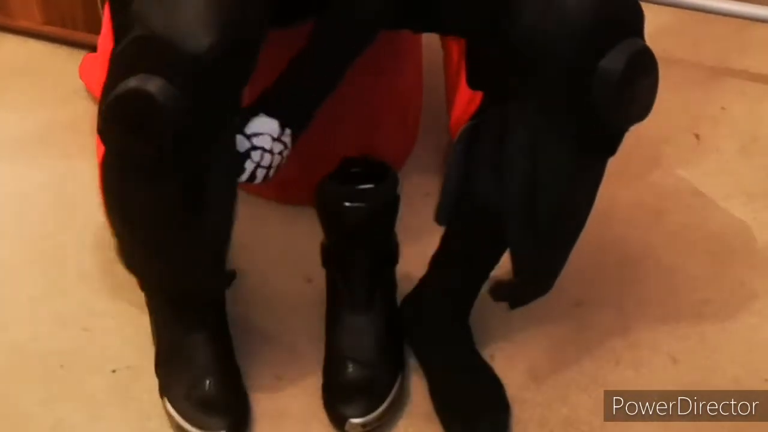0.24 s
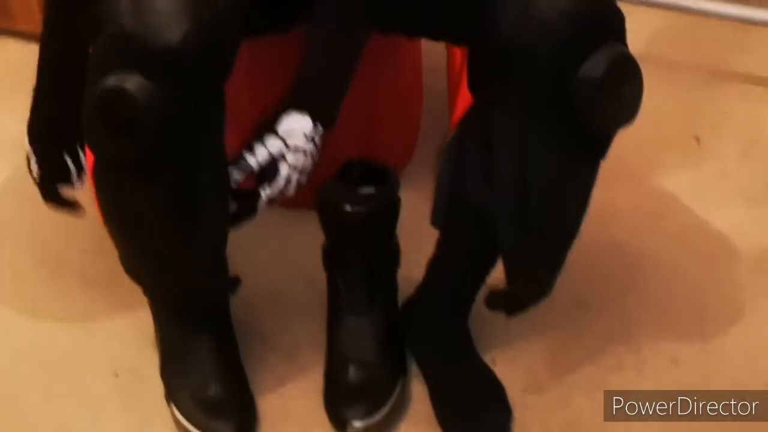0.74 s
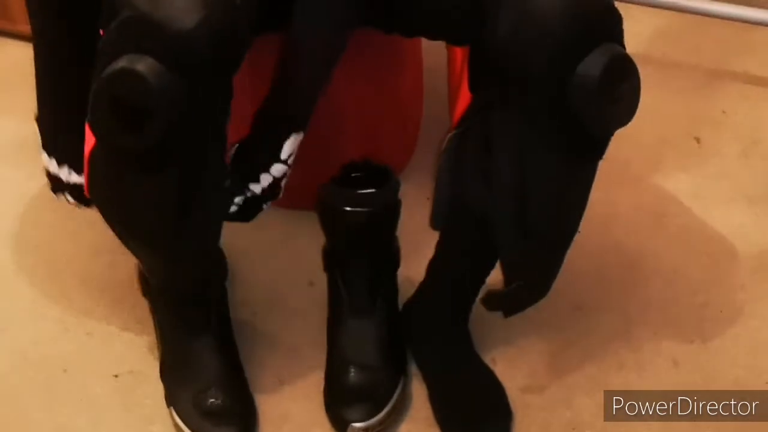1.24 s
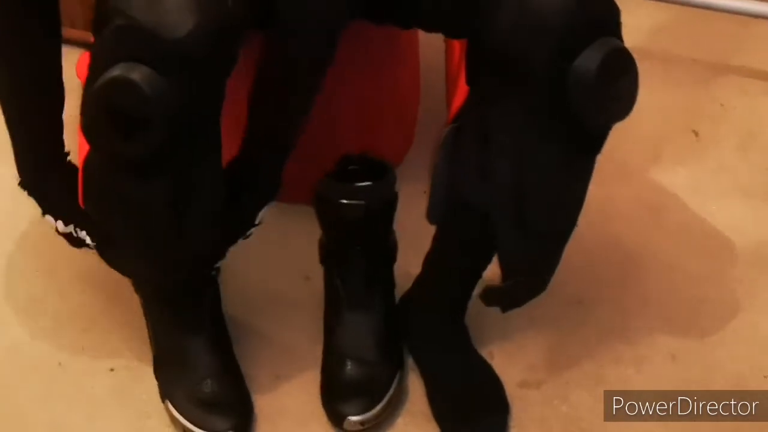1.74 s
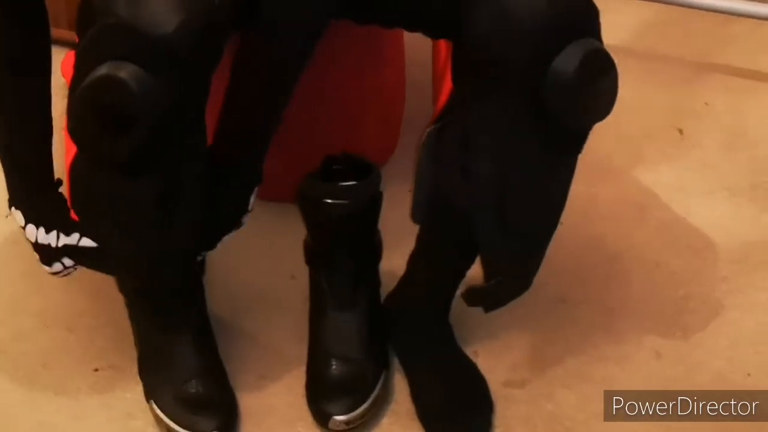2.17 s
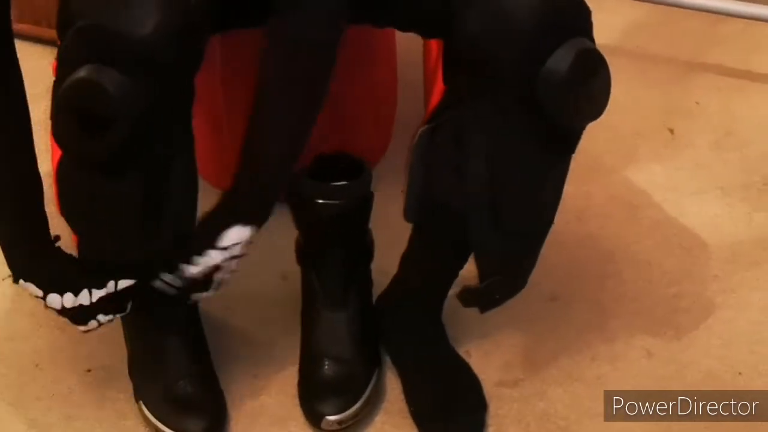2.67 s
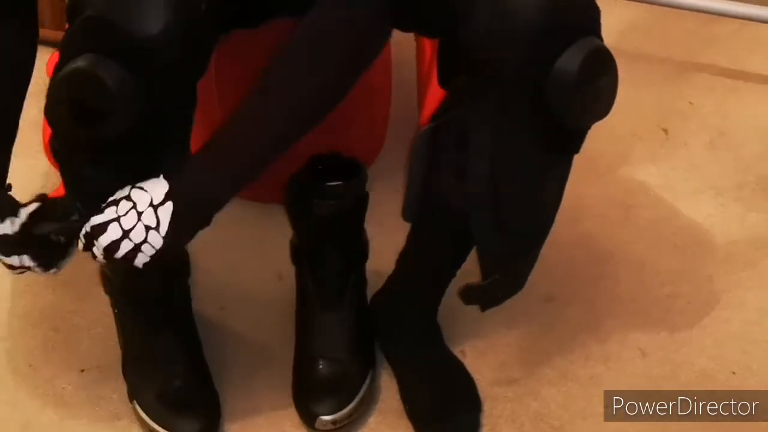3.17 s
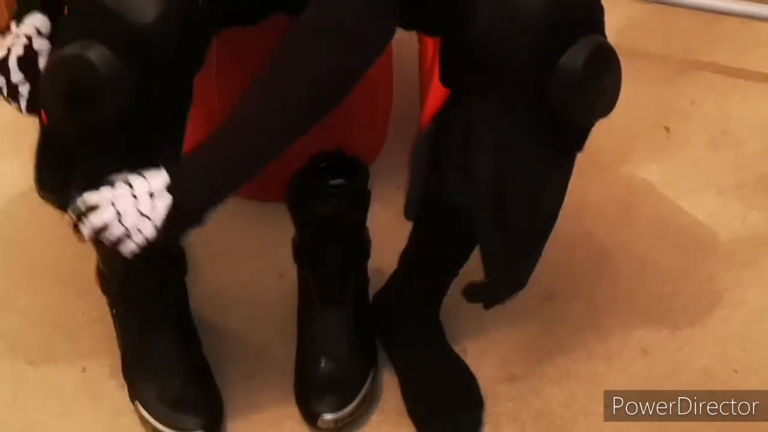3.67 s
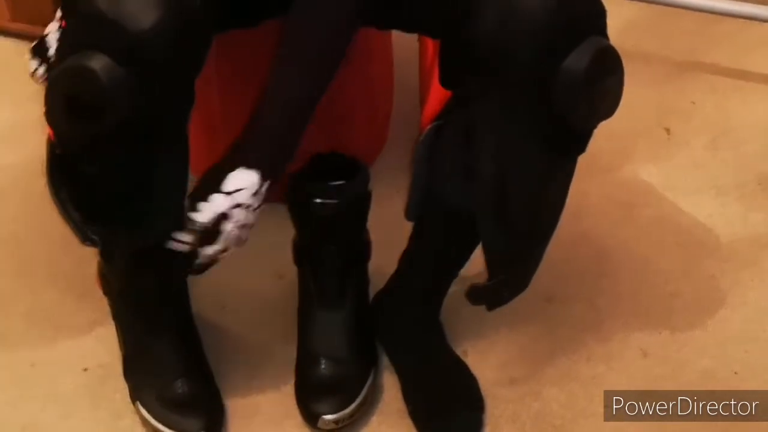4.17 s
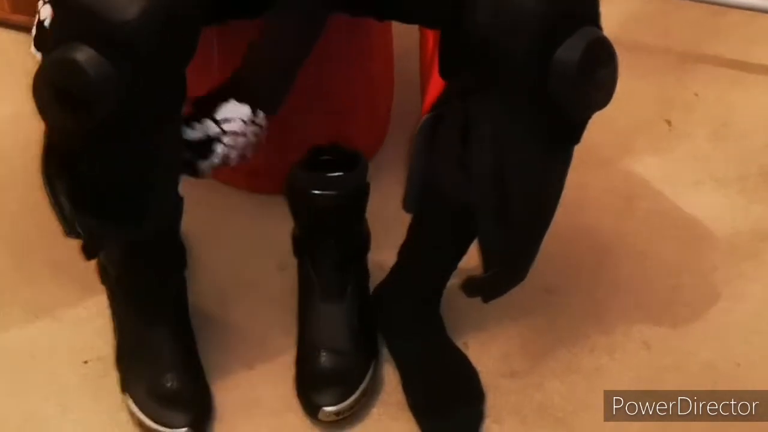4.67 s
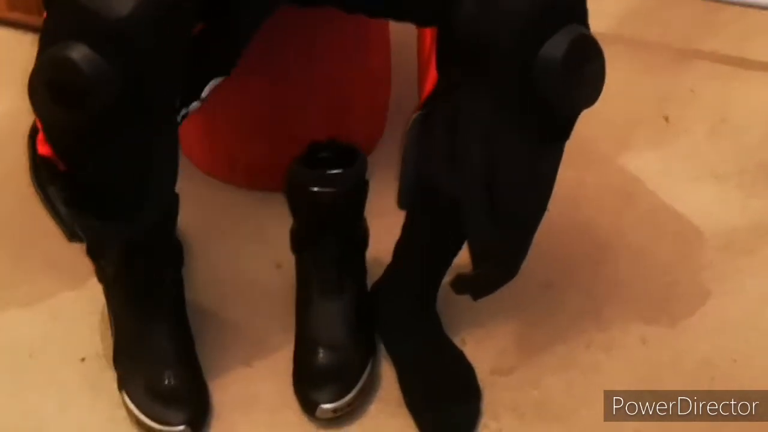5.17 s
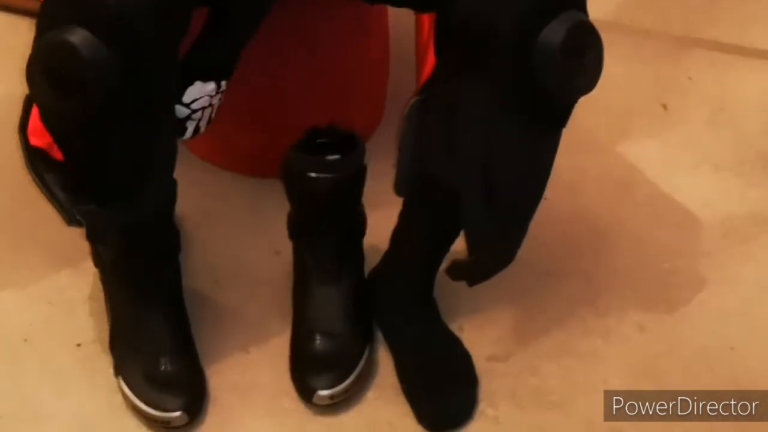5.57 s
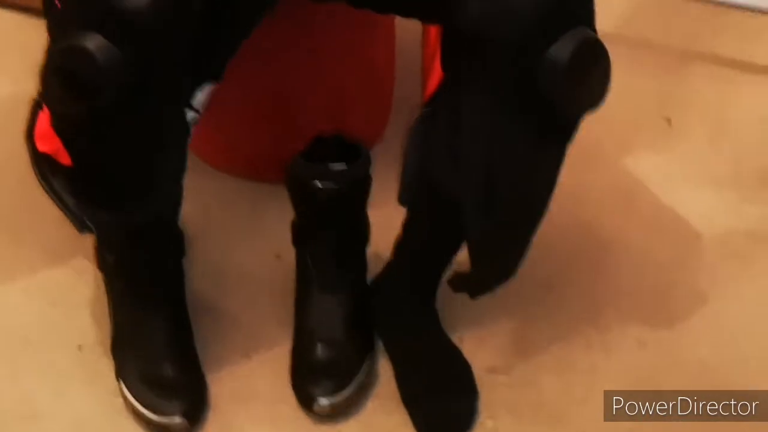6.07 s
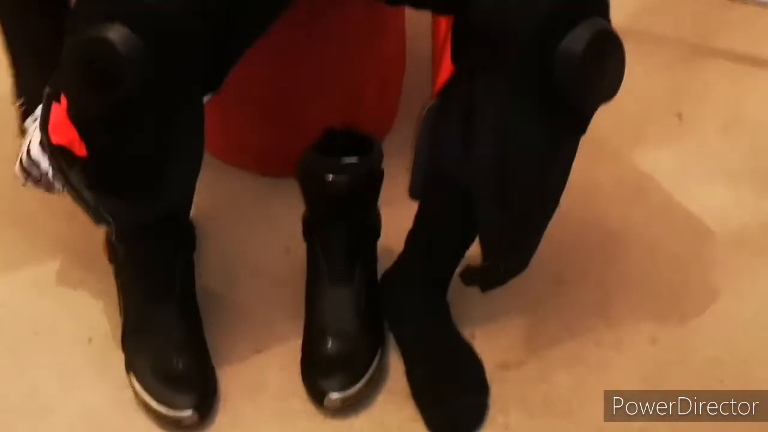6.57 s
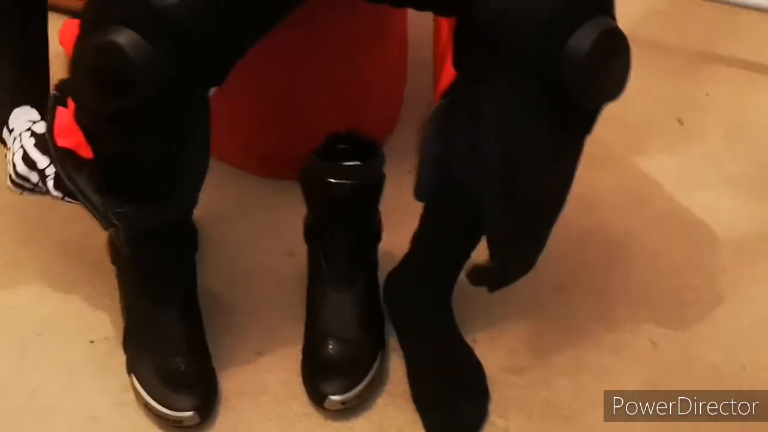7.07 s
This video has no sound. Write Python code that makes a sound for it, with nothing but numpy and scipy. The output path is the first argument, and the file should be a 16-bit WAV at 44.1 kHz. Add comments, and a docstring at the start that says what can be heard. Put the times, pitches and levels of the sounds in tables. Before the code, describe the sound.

A distant engine drones throughout, wavering in strength over a deep rumble and faint room hiss. A boot heel bumps the floor right at the start, then lands its heaviest dull thud at about 0.5 seconds, briefly booming in the hard-walled room alongside a scrape and clicks. From 1.2 to 2.3 seconds, gloved hands work the boot and straps, with short leather scrapes and sharp buckle ticks, and a softer thud near 1.6 seconds. The loudest scraping of leather and webbing comes between 2.7 and 3.1 seconds, with more clicks. A tick and another heel thud follow around 3.7 seconds, then a single click at 4.2. After a lull, a quick cluster of ticks and scrapes arrives near 5.8 seconds. Faint rubbing and a few small ticks trail off by 7 seconds, while the drone swells briefly.

```python
"""A far engine drones, wavering in strength, over a deep rumble and faint room hiss.
A boot heel thuds on the floor and sets the low modes of a hard-walled room ringing.
Gloved hands work the boot and its straps: leather and webbing scrape in clumps of tiny slips,
while buckles and stiff edges tick, each a snap of noise with a few cycles of ring."""
import sys
import numpy as np
from scipy import signal
from scipy.fft import rfft, irfft, next_fast_len
from scipy.io import wavfile

SR = 44100
rng = np.random.default_rng(int(sys.argv[2]) if len(sys.argv) > 2 else 0)


def to_wav(sig):
    """Store sig (one row per channel, or 1-D mono) as 16-bit WAV at the path in sys.argv[1].

    Samples outside -1..1 are clipped; the rate is SR.
    """
    pcm = np.clip(np.atleast_2d(sig), -1, 1) * 32767
    pcm = np.round(pcm).astype(np.int16)
    wavfile.write(sys.argv[1], SR, pcm.T)  # frames by channels


N = 322299

# How alike the two ears hear the room: freq_hz, correlation
EAR_LIKENESS = [(60, 0.99), (180, 0.98), (550, -0.22), (1650, 0.11), (4970, -0.12), (15000, -0.014)]
# Strokes of leather and webbing; treble and body are set against the mids:
# start_s, swell_s, hold_s, fade_db_per_s, level_db, treble_db, body_db, creak_hz
STROKES = [ (0.325, 0.0038, .003, 72, -60, -12.5, -11, 2020), (0.398, .04, .005, 300, -53.5, -4, -10, 2300),
           (0.447, 0.0033, 0.0037, 400, -34.5, -4.5, -7, 2600),
           (0.49, 0.013, 0.012, 283, -35.5, -6, -19, 1760), (0.712, 0.012, .02, 300, -61.5, -2, -4, 2000),
           (1.044, .002, 0.0034, 480, -53, 2, -19, 2400), (1.197, 0.0093, 0.017, 300, -57, -0.5, -5, 1500),
           (1.23, 0.0029, 0.048, 331, -40.5, -0.5, -9, 2410),
           (1.344, 0.041, 0.012, 300, -50.5, 2, -3.5, 2340), (1.406, .008, 0.03, 250, -38, -0.5, -23, 2340),
           (1.457, .01, 0.013, 300, -43.5, -24, 2, 1300), (1.473, 0.0041, 0.063, 121, -41, 0.5, -30, 2240),
           (1.601, 0.014, 0.0062, 223, -46, -3, -2.5, 2350), (1.736, 0.012, 0.0031, 547, -47, 8, -18, 2830),
           (1.831, 0.023, 0.012, 175, -40.5, 3.5, -15, 2390), (1.768, 0.023, .02, 200, -59, 6.5, -1, 2500),
           (1.927, 0.0019, 0.0017, 356, -34.5, -18, -17, 1780),
           (2.076, 0.0044, 0.017, 303.5, -48, -2.5, -8, 2060),
           (2.214, 0.0036, .015, 341, -56.5, 2, -16, 2700), (2.24, .003, 0.017, 336, -54, 7, -4, 2670),
           (2.41, 0.047, 0.055, 291, -63, 0, -8, 2000), (2.498, 0.0032, 0.026, 294, -45, 1.5, -7, 2380),
           (2.651, .003, 0.012, 202, -50.5, 6.5, -12, 2730), (2.677, .006, .03, 150, -48, 6, -11, 2750),
           (2.726, .006, 0.032, 152, -53.5, 6, 0.5, 2700), (2.798, 0.011, 0.034, 200, -37, 4.5, -21, 2240),
           (2.836, 0.038, 0.073, 300, -30.5, 1.5, -15.5, 2500),
           (2.925, 0.031, 0.032, 411, -29.5, 2, -12.5, 1950),
           (3.045, 0.028, 0.0061, 225, -44.5, -3, -8, 1690), (3.147, .03, 0.049, 196, -49, -8, -15, 1680),
           (3.24, .01, 0.027, 304, -50.5, -8, -23, 2260), (3.335, .002, .004, 212, -51.5, -6, -14, 2070),
           (3.563, .003, 0.0035, 74, -55, -15, -13, 1800), (3.666, .003, .003, 200, -46.5, -5, -26, 2480),
           (3.707, 0.012, 0.068, 53, -59.5, -3, -2, 1790),
           (4.231, .002, 0.0027, 373, -39.5, -26, -11.5, 1940),
           (4.302, 0.055, 0.0078, 271, -67.5, -1, -25, 1720),
           (4.477, 0.0035, 0.022, 150, -61.5, 0, -6, 1880),
           (4.561, 0.021, .003, 403, -50.5, 8.5, -18, 2720), (4.722, 0.014, 0.0012, 230, -62, 1, -21, 2370),
           (5.706, 0.0018, 0.0027, 131, -48, -2.5, -13, 2230),
           (5.755, 0.0066, 0.0024, 650, -39.5, -6.5, -11.5, 1900),
           (5.795, 0.0017, .002, 652, -32.5, -2.5, -16, 2700),
           (5.807, 0.0024, 0.036, 250, -44, -12, -8, 1460), (5.894, .004, 0.028, 359, -45, -7.5, -7, 1560),
           (5.654, .01, .02, 300, -63.5, 1, -5, 2200), (5.963, .003, 0.05, 204, -64, -16, -1, 1920),
           (6.228, 0.0022, .002, 600, -44.5, -35, -7.5, 2300),
           (6.235, .003, 0.036, 300, -57, -31, -2, 1360), (6.3, .05, .07, 203, -65, -18, -0.5, 1660),
           (6.466, .003, .003, 178, -59.5, -1.5, 1.5, 1750), (6.583, 0.048, 0.046, 90, -61.5, -8, -2, 1740),
           (6.879, .01, 0.098, 206, -70.5, 5, 0, 1770), (6.97, .005, 0.025, 166, -63, -9, -5, 1660),
           (6.345, .003, 0.009, 302, -63.5, -6, -10, 3200), ]
RIGHT_LAG_SAMPLES = 3      # the boot reaches the right side late


def amp(db):
    return 10 ** (np.asarray(db) / 20)


def unit_rms(x):
    return x / np.sqrt(np.mean(x ** 2) + 1e-20)


def envelope(points):
    return np.interp(np.arange(N) / SR, *np.transpose(points))


def at_hz(points, hz):
    freqs, values = np.transpose(points)
    return np.interp(np.log(hz), np.log(freqs), values)


def band(x, low_hz, high_hz):
    return signal.sosfilt(signal.butter(2, [low_hz, high_hz], "band", fs=SR, output="sos"), x)


def coloured(x, spectrum):
    """Shapes a signal with an EQ curve."""
    size = next_fast_len(N)
    hz = np.maximum(np.arange(size // 2 + 1) * SR / size, 1)
    return irfft(rfft(x, size) * amp(at_hz(spectrum, hz)), size)[..., :N]


def drift(rate_hz):
    """Smooth random wander of unit spread: noise through two one-pole low-passes."""
    hop, run_in = 40, 2000
    pole = np.exp(-2 * np.pi * rate_hz * hop / SR)
    noise = rng.standard_normal(N // hop + run_in + 2)
    slow = signal.lfilter([1], [1, -2 * pole, pole * pole], noise)[run_in:]
    return np.interp(np.arange(N) / hop, np.arange(len(slow)), unit_rms(slow))


def ring(clicks, hz, t60_s):
    """One mode: a unit click starts a decaying sine of height 1."""
    r, w = amp(-60 / (t60_s * SR)), 2 * np.pi * hz / SR
    return signal.lfilter([0, np.sin(w)], [1, -2 * r * np.cos(w), r * r], clicks + 1e-18)


def stereo_bands(length):
    """Yields half-octave bands of stereo noise, nearly mono in the bass and wide above."""
    edges_hz = 45 * 2 ** np.arange(0, 8.6, .5)
    white = rng.standard_normal((2, 2, length))
    for k, (low, high) in enumerate(zip(edges_hz, edges_hz[1:])):
        mid, side = band(white[k % 2], low, high)
        hz = np.sqrt(low * high)
        alike = at_hz(EAR_LIKENESS, hz)
        yield hz, np.sqrt(1 + alike) * mid + np.sqrt(1 - alike) * side * [[1], [-1]]


def engine_drone(firing_hz=63, waver_hz=.8):
    """A far engine's firing tone and overtones share one wandering pitch; the overtones swell less."""
    # Strength of the firing tone: time_s, level_db
    swells = [(0.0, -52.5), (0.2, -44), (0.39, -84), (0.45, -40), (0.63, -35.5), (1.14, -46), (1.22, -61),
              (1.26, -47.5), (1.77, -45.5), (1.87, -36), (2.07, -39), (2.2, -56), (2.82, -38),
              (2.86, -45.5), (3.11, -33.5), (3.25, -49.5), (3.39, -41), (3.45, -57.5), (3.6, -43),
              (3.7, -65), (3.8, -36.5), (4.15, -57), (4.47, -44.5), (5.04, -58.5), (5.35, -44), (5.49, -60),
              (6.02, -34.5), (6.08, -50.5), (6.42, -29.5), (7.3, -50.5)]
    # Engine overtones: harmonic, level_db
    overtones = [(2, -17.5), (3, -27), (4, -38.5), (5, -39)]
    level_db = envelope(swells)
    phase = 2 * np.pi * np.cumsum(firing_hz + waver_hz * drift(2.586)) / SR
    tone = amp(level_db + 2.53 * drift(11)) * np.sin(phase)
    overtone_db = 0.81 * (level_db + 45.5) - 44
    for harmonic, db in overtones:
        tone += amp(overtone_db + db + 2.0 * drift(7.6)) * np.sin(harmonic * phase)
    sway = amp(np.array([[.3], [-.3]]) * drift(3.3))
    return np.sqrt(2) * tone * sway


def floor_rumble():
    """Deep, lumpy noise comes through the floor."""
    # Strength of the rumble: time_s, level_db
    swells = [(0.0, -35), (0.41, -80), (0.45, -42.5), (1.36, -50), (1.83, -38), (1.91, -46.5),
              (3.52, -48.5), (3.76, -34.5), (4.13, -53.5), (4.55, -43.5), (4.84, -57.5), (5.12, -43),
              (5.71, -54.5), (6.02, -30), (6.18, -58), (6.24, -36.5), (6.69, -46.5), (7.3, -51)]
    lows = band(rng.standard_normal(N + SR), 17.4, 34.4)
    lows = band(lows, 8.1, 38)[SR:]
    return amp(envelope(swells)) * unit_rms(lows)


def room_hiss(level_db=-56.5):
    """Faint room tone whose bands waver, slowly together and faster on their own."""
    # Colour of the room tone: freq_hz, gain_db
    colour = [(24, -41), (40, 1.5), (93, -16.5), (197, -21), (247, -29), (377, -29.5), (577, -37),
              (740, -38.5), (838, -32.5), (1190, -35.5), (1860, -32.5), (4460, -49), (7710, -47.5),
              (10400, -55.5), (15500, -57)]
    together_db = drift(0.94)
    hiss = sum(noise * amp(together_db + 1.8 * drift(7)) for _, noise in stereo_bands(N))
    hiss = coloured(hiss, colour)
    return amp(level_db) * hiss / np.std(band(hiss, 64.7, 15000))


def heel_thuds():
    """The heel pushes into the floor and rings the low modes and the room; soft contact sounds dull."""
    # Heel blows: start_s, level_db, contact_cutoff_hz
    blows = [(0.101, -15, 187), (0.446, -5.5, 364), (0.622, -20, 183), (1.627, -13.5, 224),
             (3.787, -15, 214), (4.715, -35, 192)]
    # Low modes of floor and room: pitch_hz, level_db, t60_s
    modes = [(92.3, -2, 0.82), (124.1, 7, 0.31), (136.2, 1, 0.27), (162.3, 3, 0.27), (183.5, -3.5, 0.35),
             (211.8, -4.5, 0.38), (250, -9, 0.23), (283.3, -23.5, 0.37), (327, -34, 0.23),
             (386.7, -3.5, 0.13), (442, -2.5, 0.069), (600, -2.5, 0.12)]
    pushes = np.zeros(N)
    for start_s, db, contact_hz in blows:
        click = np.zeros(2000)
        click[0] = -amp(db + 11.0)
        at = round(start_s * SR)
        pushes[at:at + 2000] += signal.sosfilt(signal.butter(4, contact_hz, fs=SR, output="sos"), click)
    pushes = band(pushes, 117, 405)      # the floor yields over a cycle or two
    out = amp(24.5) * room_tail(np.array([pushes, pushes]))
    for k, (hz, db, t60_s) in enumerate(modes):
        lean = 0.43 * (-1) ** k * np.sqrt(1 - at_hz(EAR_LIKENESS, hz))   # upper modes favour one ear
        out += amp(db - 24.0) * ring(pushes, hz, t60_s) * [[1 + lean], [1 - lean]]
    return signal.sosfilt(signal.butter(1, 70, "high", fs=SR, output="sos"), out)


def room_tail(x, wet_db=-8, build_s=0.0047):
    """Reflections off the hard walls build into a diffuse tail that dies band by band."""
    # Decay of the room: freq_hz, t60_s
    decay = [(200, 0.38), (1000, 0.34), (3000, 0.28), (8000, 0.16), (14000, 0.25)]
    t = np.arange(SR // 2) / SR
    tail = sum(noise * amp(-60 * t / at_hz(decay, hz)) for hz, noise in stereo_bands(len(t)))
    tail *= 1 - np.exp(-t / build_s)
    tail /= np.sqrt(np.sum(tail ** 2) / 2)
    return amp(wet_db) * signal.fftconvolve(x, tail, axes=1)[:, :N]


def stroke_gain(share_db, rest_share_db, fade_speed=1, bite_db=11.5):
    """Each stroke bites in bite_db under full level, swells, holds and fades over a faint cloth rustle."""
    t = np.arange(0, N, 64) / SR
    start_s, swell_s, hold_s, fade_db_per_s, level_db = np.transpose(STROKES)[:5, :, None]
    age = t - start_s
    swell_db = -bite_db * np.clip(1 - age / swell_s, 0, 1)
    fade_db = -fade_speed * fade_db_per_s * np.maximum(age - swell_s - hold_s, 0)
    stroke_db = level_db + np.reshape(share_db, (-1, 1)) + swell_db + fade_db
    rustle_db = -76.5 + rest_share_db
    power = np.sum(amp(2 * stroke_db) * (age >= 0), axis=0) + amp(2 * rustle_db)
    return np.interp(np.arange(N) / SR, t, np.sqrt(power))


def leather_scrapes(slips_per_s=5000, rest_creak_hz=1650, left_db=4):
    """Clumps of uneven slips excite a creak resonance; each ear hears another part of the boot."""
    # Colour of rubbed leather and webbing: freq_hz, gain_db
    colour = [(88, -72), (150, 3.5), (314, -6), (388, -9), (453, -7.5), (656, -10.5), (722, -3),
              (796, -7.5), (948, 1), (1320, 5.5), (5990, 1), (7410, 5), (15500, -25.5)]
    treble_db, body_db, creak_hz = np.transpose(STROKES)[5:]
    sizes = amp(3.23 * np.minimum(rng.exponential(1, (2, N)), 4)) * rng.choice([-1, 1], (2, N))
    clumps = amp(1.7 * drift(50))
    left, right = sizes * (rng.random((2, N)) < slips_per_s / SR) * clumps
    right = 1.195 * right + 0.44 * np.roll(left, RIGHT_LAG_SAMPLES)
    slips = coloured(np.array([left, right]), colour)
    lows, lows_and_mids = (signal.sosfiltfilt(signal.butter(3, hz, fs=SR, output="sos"), slips)
                           for hz in (850, 3600))
    body, mids, treble = map(unit_rms, (lows, lows_and_mids - lows, slips - lows_and_mids))
    scrape = 0.65 * stroke_gain(0, 0) * mids
    # Strokes start bright and darken as they fade.
    scrape += stroke_gain(body_db, rest_share_db=-7.5, fade_speed=0.76) * body
    scrape += stroke_gain(treble_db, rest_share_db=-0.5, fade_speed=1.15, bite_db=9) * treble
    for hz in np.geomspace(900, 4400, num=12):      # bands nearest the creak resonance speak loudest
        near_db, rest_db = (-164 * np.log(centre / hz) ** 2 for centre in (creak_hz, rest_creak_hz))
        scrape += 0.25 * stroke_gain(near_db, rest_db) * unit_rms(band(slips, hz / 1.133, hz * 1.163))
    return scrape * amp([[left_db / 2], [-left_db / 2]])


def buckle_ticks(t60_cycles=26.5, snap_t60_s=0.013):
    """Buckles and stiff edges knock: a snap of noise and a ring of as many cycles at any pitch."""
    # Ticks of buckles and edges: start_s, level_db, pitch_hz, left_over_right_db
    ticks = [(0.333, -37.5, 1980, -5), (0.45, -25, 1520, -5), (0.502, -26, 2120, -12),
             (1.164, -42, 1370, 7), (1.216, -34, 1250, 4), (1.235, -30, 1390, -8), (1.405, -28, 2430, 12),
             (1.416, -18, 2080, -2), (1.463, -16, 2270, -3), (1.578, -22.5, 3570, -12),
             (1.609, -16, 2480, -4), (1.747, -42, 5700, 2.5), (1.838, -24, 2200, 1.0),
             (1.926, -22, 1300, 2), (2.083, -32, 2020, 7.5), (2.217, -42, 5460, 2), (2.226, -35, 3050, 10),
             (2.243, -33, 2700, -3), (2.502, -36, 2220, -4), (2.664, -52, 7680, 23),
             (2.682, -32.5, 2740, 26), (2.731, -26.5, 2620, 17), (2.81, -18.5, 2030, -13),
             (2.841, -23, 2600, 14), (3.17, -41, 1850, 3), (3.24, -32.5, 2380, 12), (3.337, -37, 2600, 0.0),
             (3.561, -37, 1500, -2.0), (3.667, -19.5, 2600, 10), (4.228, -23.5, 2020, -2),
             (4.572, -39, 7740, 9), (5.709, -38, 2020, 9), (5.757, -31, 2270, 11), (5.799, -25.5, 2900, 25),
             (5.883, -43, 1333, -16), (6.231, -33.5, 2488, 1), (6.475, -49, 1410, 0),
             (6.656, -50, 1800, 28)]
    out, t = np.zeros((2, N)), np.arange(900) / SR
    for start_s, db, hz, left_db in ticks:
        noise = unit_rms(band(rng.standard_normal(len(t)), .5 * hz, 1.68 * hz))
        snap = 0.41 * noise * amp(-60 * t / snap_t60_s)
        cycles = t * hz
        ping = np.sin(2 * np.pi * cycles) * amp(-60 * cycles / t60_cycles)
        attack = 1 - np.exp(-cycles / .5)
        tick = amp(db - 6.5) * attack * (ping + snap)
        for ear, side in enumerate((1, -1)):
            at = round((start_s + .0008) * SR) + ear * RIGHT_LAG_SAMPLES
            out[ear, at:at + len(t)] += amp(side * left_db / 2) * tick
    return out


def buckle_ring(start_s=5.9):
    """One touched metal part rings on, thin and fluttering."""
    touch = np.zeros(N)
    touch[round(start_s * SR)] = amp(-71.5)
    return ring(touch, hz=5895, t60_s=0.5) * amp(10.0 * drift(80))


def scene():
    """Handwork and heel thuds in the room, over the bed of engine, rumble and hiss."""
    hands = leather_scrapes() + buckle_ticks() + buckle_ring()
    reflections = room_tail(hands[[0, 0]])      # the left channel feeds the room
    return hands + reflections + heel_thuds() + engine_drone() + floor_rumble() + room_hiss()


def record(dry, stop_hz=15800):
    """A steep low-pass shaves off the very top."""
    return signal.sosfilt(signal.cheby2(22, 60, stop_hz, fs=SR, output="sos"), dry)


dry = scene()
out = record(dry)
to_wav(out)
```